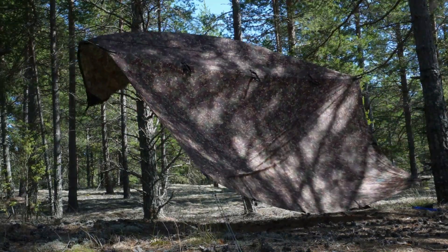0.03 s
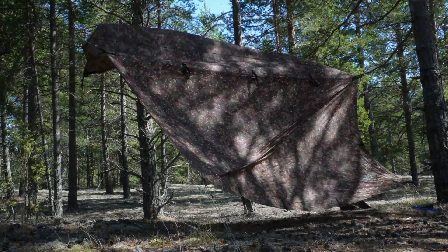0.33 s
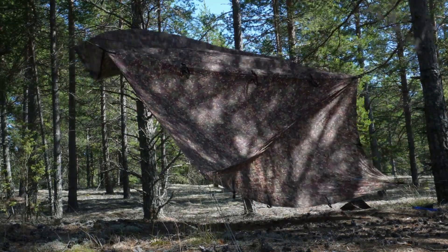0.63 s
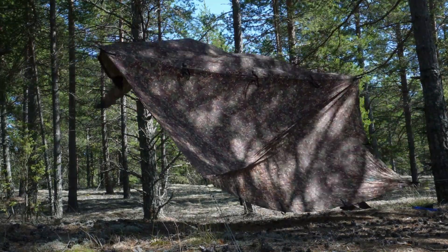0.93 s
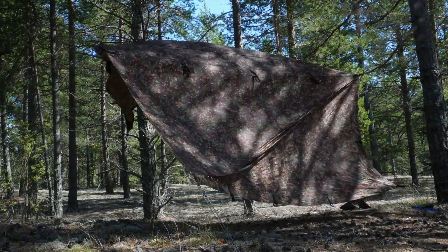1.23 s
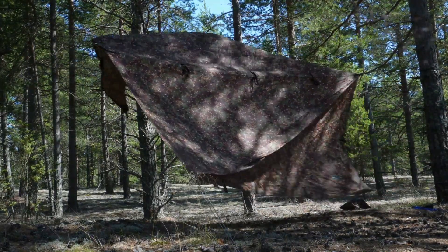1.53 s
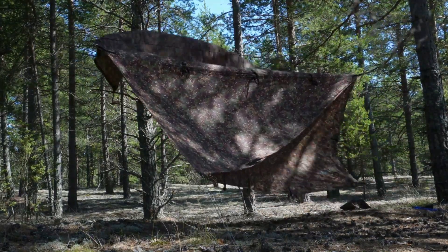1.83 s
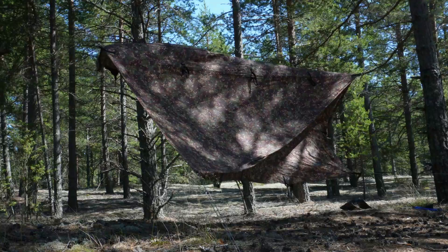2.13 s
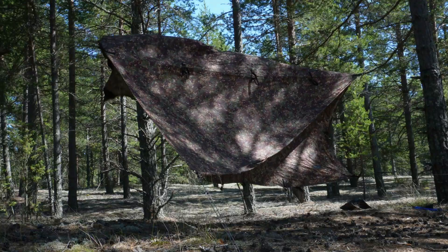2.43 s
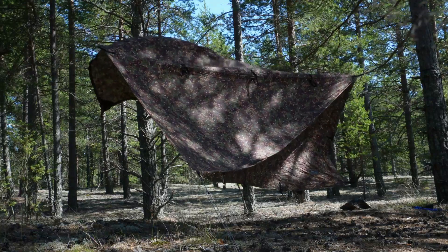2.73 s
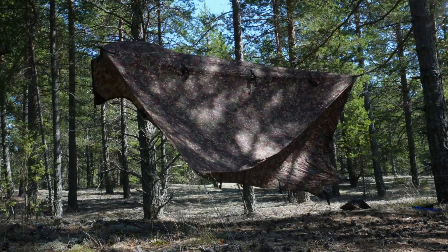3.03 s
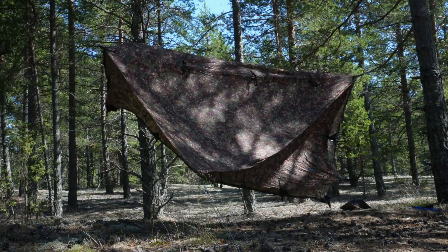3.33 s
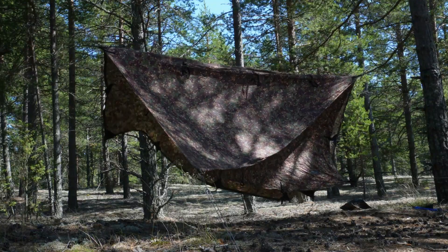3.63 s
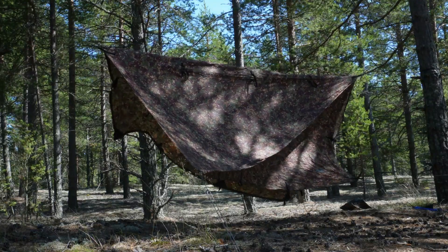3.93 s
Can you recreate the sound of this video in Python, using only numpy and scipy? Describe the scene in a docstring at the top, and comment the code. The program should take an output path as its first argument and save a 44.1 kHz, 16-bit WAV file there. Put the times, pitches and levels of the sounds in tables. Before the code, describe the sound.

A tarp rustles, snaps and flaps in gusty wind that rumbles on the microphone.

```python
"""A tarp strung between pines moves in gusty wind. From the start its cloth rustles as small creases
buckle and single folds snap, while eddies buffet the microphone and the needles hiss faintly.
At 0.67 s the sheet billows with a low whump; from then to 1.4 s slack corners flap.
The rustle sinks after 2 s and revives near 3 s, followed by a run of snaps.
At 3.8 s, cloth slides over cloth."""
import sys
import numpy as np
from scipy import signal
from scipy.fft import rfft, irfft, next_fast_len
from scipy.io import wavfile
from scipy.ndimage import uniform_filter1d, map_coordinates

SR = 44100
rng = np.random.default_rng(int(sys.argv[2]) if len(sys.argv) > 2 else 0)


def transcribe(signal):
    """Save signal, clipped to [-1, 1], as a 16-bit WAV file at the path in sys.argv[1]."""
    frames = np.atleast_2d(signal).T
    limited = np.clip(frames, -1, 1)
    pcm = np.round(limited * 32767).astype(np.int16)
    wavfile.write(sys.argv[1], SR, pcm)


N = 176400

# Spectrum of the sheet's drumming belly: f/Hz, relative level/dB
BELLY_SPECTRUM = [(40, -16), (130, -1), (230, 1.4), (330, 2.6), (430, -1), (560, -4), (750, -14.5),
                  (1300, -27.5), (4000, -44.5)]


def amp(db):
    """Amplitude ratio of a level in decibels."""
    return 10 ** (np.asarray(db) / 20)


def unit(x):
    """Normalisation to rms 1."""
    return x / np.sqrt(np.mean(x ** 2) + 1e-20)


def curve(rows):
    """Linear interpolation of (t/s, value) rows at every sample."""
    return np.interp(np.arange(N) / SR, *np.transpose(rows))


def wobble(rate_hz):
    """Smooth random modulation: a spline through Gaussian knots."""
    knots = rng.standard_normal(int(N * rate_hz / SR) + 4)
    return map_coordinates(knots, [np.arange(N) * rate_hz / SR])


def coloured(x, spectrum, tilt=0):
    """Minimum-phase filtering by (f/Hz, level/dB) rows, tilted in dB per octave."""
    m = 2 * next_fast_len(len(x) // 2 + 2048)
    f, db = np.transpose(spectrum)
    log_f = np.log(np.fft.rfftfreq(m, 1 / SR) + 1)
    gain_db = np.interp(log_f, np.log(f), db + tilt * np.log2(f / f.mean()))
    cepstrum = irfft(np.log(amp(gain_db)), m)
    cepstrum[1:m // 2] *= 2  # folding makes the filter causal
    cepstrum[m // 2 + 1:] = 0
    return irfft(rfft(x, m) * np.exp(rfft(cepstrum)), m)[:len(x)]


def noise(spectrum):
    """Spectrally shaped Gaussian noise of rms 1."""
    return unit(coloured(rng.standard_normal(N), spectrum))


def steady(x, size):
    """Division by the running rms evens the level over size samples."""
    power = uniform_filter1d(uniform_filter1d(x ** 2, size), size)
    return x / np.sqrt(np.abs(power) + 1e-12)


def add(out, start_s, sound):
    """Superposition of a sound from start_s on."""
    part = out[round(start_s * SR):][:len(sound)]
    part += sound[:len(part)]


def wind():
    """Turbulence: large eddies rumble on the microphone, small ones flutter, and pine needles hiss."""
    # Strength of large and small eddies: t/s, relative level/dB
    gusts = [(0.0, -32), (0.1, -37), (0.36, -32.5), (0.44, -30), (0.96, -33.5), (1.02, -27), (1.12, -32.5),
             (1.5, -34.5), (2.06, -30.5), (2.12, -32.5), (2.42, -32), (2.62, -27.5), (2.86, -27),
             (2.98, -28.5), (3.48, -32.5), (3.54, -36.5), (3.74, -37), (4.0, -39.5)]
    eddies = [(0.0, -38), (0.24, -33.5), (0.3, -35.5), (0.46, -40), (0.53, -28), (0.64, -49), (0.79, -33.5),
              (0.9, -47.5), (1.0, -44), (1.3, -47.5), (1.76, -39.5), (2.05, -46.5), (2.14, -39),
              (2.25, -44), (2.45, -39.5), (2.54, -33.5), (2.72, -38.5), (2.79, -35.5), (2.9, -32.5),
              (2.97, -52), (3.04, -32), (3.12, -39.5), (3.21, -35.5), (3.27, -48), (3.35, -36), (3.48, -47),
              (3.64, -41), (4.0, -43.5)]
    # Spectra of the three flow noises: f/Hz, relative level/dB
    rumble_spectrum = [(5, -20), (14, 2.5), (22, 3.5), (33, -5.5), (50, -12.5), (80, -20.5), (200, -43),
                       (800, -75)]
    flutter_spectrum = [(20, -36), (45, -0.5), (68, -0.5), (100, -6.5), (150, -12.5), (250, -27),
                        (600, -55.5), (3000, -77)]
    needle_spectrum = [(60, -4), (250, -2), (500, -8.5), (800, -11.5), (1300, -15), (2000, -16),
                       (3000, -21), (4400, -23.5), (5600, -25.5), (7000, -27), (9000, -28.5), (12000, -31),
                       (15500, -35)]
    rumble = amp(curve(gusts) + 3) * steady(noise(rumble_spectrum), size=6000)
    flutter = amp(curve(eddies) + 1.5) * steady(noise(flutter_spectrum), size=4000)
    hiss = amp(-45.5 + 0.15 * wobble(2.6)) * noise(needle_spectrum)
    return rumble + flutter + hiss


def forest_echo(x, t60_s=0.062, rise_s=0.0032):
    """Scattering from trunks and ground gives a short, exponentially decaying echo."""
    t = np.arange(SR // 2) / SR
    tail = rng.standard_normal(len(t)) * amp(-60 * t / t60_s) * (1 - np.exp(-t / rise_s))
    return signal.fftconvolve(x, tail / np.linalg.norm(tail))[:N]


def slide(peak_s=3.827, rise_s=0.15, fall_s=0.14):
    """Sliding friction of cloth on cloth makes a hiss that swells and fades."""
    # Friction spectrum: f/Hz, relative level/dB
    friction_spectrum = [(1500, -9), (4200, -12), (5700, 6), (6800, 2), (8500, 6), (11000, 0), (15500, -8)]
    t = np.arange(N) / SR - peak_s
    swell = np.exp(-(t / np.where(t < 0, rise_s, fall_s)) ** 2)
    return amp(-52.5) * swell * noise(friction_spectrum)


def billow(peak_s=0.672, width_s=0.075):
    """The pressure of a gust fills the whole sheet, which radiates a low, ruffling whump."""
    t = np.arange(N) / SR - peak_s
    return amp(-31.5) * np.exp(-(t / width_s) ** 2) * steady(noise(BELLY_SPECTRUM), size=1000)


def flaps(decay_cycles=0.95):
    """Damped oscillation: a slack corner pulls taut with a dull knock and a puff of air."""
    # Flapping corners: t/s, relative level/dB, f/Hz
    corners = [(.661, -22.5, 330), (0.67, -22.5, 267), (.836, -24, 647), (0.989, -23.5, 370),
               (1.430, -24.5, 640)]
    out, t = np.zeros(N), np.arange(SR // 10) / SR
    for start_s, db, hz in corners:
        age = hz * t / decay_cycles
        envelope = np.sqrt(2 * age) * np.exp(0.5 - age)
        band = signal.butter(1, [hz / 2, hz * 2], "band", fs=SR, output="sos")
        puff = amp(-15) * unit(signal.sosfilt(band, rng.standard_normal(len(t))))
        add(out, start_s, amp(db + 2) * envelope * (np.sin(2 * np.pi * hz * t) + puff))
    return out


def snaps(crumple_stretch=2.1):
    """Snap-through buckling: a fold starts to give, pops with a crack and crumples on."""
    # Snapping folds: t/s, relative level/dB, tilt/(dB per octave), decay time/s
    folds = [(0.085, -20, -11, 0.0014), (0.115, -25, -4, 0.0018), (.119, -32, 6, 0.0023),
             (0.137, -19, -9.5, 0.0026), (.161, -19.5, -1, 0.0012), (.294, -20.5, -5, 0.0028),
             (0.528, -27, 2, .002), (.629, -18, -11, 0.0024), (0.6635, -36, 29, 0.0017),
             (.700, -27, 9, 0.00083), (.724, -19.5, 1, 0.0025), (.797, -24, 1.5, 0.0009),
             (0.812, -24, 5, .001), (.899, -32.5, 4.5, 0.003), (.967, -31.5, 4, .002),
             (.985, -28, -4, 0.0025), (.990, -20, -4.5, 0.0018), (.999, -33, -1, .002),
             (1.148, -25, -11, 0.00072), (1.1736, -15, 2.5, 0.0006), (1.1855, -23, 1, .001),
             (1.275, -35, 8, 0.0011), (1.442, -22.5, -3, 0.0015), (1.677, -29, 0, .0015),
             (1.72, -25, -5.5, 0.0026), (1.911, -27, -4, 0.0045), (2.092, -30, 3.5, 0.0011),
             (2.294, -36, 1, 0.0032), (2.348, -36, -3, 0.0017), (2.63, -29, -8, 0.0033),
             (2.776, -27, -3, .003), (3.003, -32, 6, .001), (3.179, -22, -1.5, 0.0048),
             (3.197, -26, 2, .003), (3.294, -24, 2.5, 0.0047), (3.325, -23, -2, .002),
             (3.377, -18, -5.5, 0.0015), (3.387, -26, -2.5, 0.0036), (3.434, -22.5, 1.5, 0.0014),
             (3.449, -21, -1, 0.0037), (3.480, -23, -1, 0.0014), (3.552, -29, -5, 0.0014),
             (3.654, -23.5, -15, 0.0021), (3.924, -25.5, -4, 0.0033), (3.966, -25, -1, 0.0067)]
    # Crack spectrum before tilting: f/Hz, relative level/dB
    crack_spectrum = [(150, -45), (700, -8.5), (1400, 4.5), (2400, 1), (3400, -2), (4400, -11),
                      (5600, -11.5), (7000, -21.5), (8800, -18), (11500, -32), (15500, -44)]
    out, lead = np.zeros(N), SR // 50
    t = np.arange(-lead, SR // 10) / SR
    for crack_s, db, tilt, decay_s in folds:
        crack, crumple = rng.standard_normal((2, len(t)))
        crack *= (t >= 0) * np.exp(-np.abs(t) / decay_s)
        crumple *= np.exp(-np.abs(t) / (decay_s * np.where(t < 0, 1, crumple_stretch)))
        pop = coloured(crack + amp(-15) * crumple, crack_spectrum, tilt)
        pop *= np.sqrt(decay_s * SR) / np.linalg.norm(pop)  # energy grows with decay time
        add(out, crack_s - lead / SR, amp(db - 6) * pop)
    return out


def creases(spectrum, per_s, spread_db, patches=16):
    """Shot noise: patches of cloth click at random, each with its own colour and swell."""
    out = np.zeros(N)
    for _ in range(patches):
        clicks = (rng.random(N) < per_s / patches / SR) * rng.choice([-1, 1], N)
        sizes = amp(spread_db * np.minimum(rng.standard_normal(N), 2))
        colour = [(hz, db + 3.5 * rng.standard_normal()) for hz, db in spectrum]
        out += unit(coloured(clicks * sizes, colour)) * amp(5 * wobble(rate_hz=11))
    return steady(out, size=1800)


def rustle(brightening=0.2, belly_coupling=0.78):
    """Buckling and friction of creases, brighter in hard motion; the weave ticks and the belly drums."""
    # Strength of the cloth's motion and of the stiff weave's crackle: t/s, relative level/dB
    motion = [(0.0, -38), (0.13, -36), (0.18, -38), (0.26, -39.5), (0.39, -31.5), (0.44, -34), (0.5, -32),
              (0.56, -33.3), (0.63, -30.3), (0.71, -29.5), (0.76, -32.5), (0.84, -41), (0.95, -40),
              (0.99, -36.5), (1.04, -37.5), (1.13, -37.5), (1.2, -36), (1.35, -44.5), (1.64, -35),
              (1.8, -41.5), (1.93, -36), (1.96, -38), (2.0, -34), (2.04, -43), (2.15, -40), (2.18, -50),
              (2.42, -49.5), (2.68, -43.5), (2.89, -37.5), (3.05, -35), (3.16, -38.5), (3.18, -37.5),
              (3.22, -39.5), (3.31, -35), (3.36, -43.5), (3.45, -39.5), (3.5, -44.5), (3.72, -47),
              (3.8, -41), (3.86, -42), (3.96, -37), (4.0, -42.5)]
    crackle = [(0.0, -46), (0.14, -63), (0.24, -54), (0.37, -53), (0.46, -59), (0.62, -47), (0.73, -54),
               (0.83, -71), (1.0, -63), (1.33, -58.5), (1.55, -54), (1.68, -46.5), (1.7, -63), (1.79, -57),
               (2.0, -49.5), (2.06, -54.5), (2.14, -50.5), (2.18, -64), (2.34, -55.5), (2.42, -61),
               (2.8, -59), (3.04, -66), (3.33, -50), (3.58, -57.5), (3.96, -50)]
    # Spectra of creases and of sharp ticks: f/Hz, relative level/dB
    cloth_spectrum = [(100, -28.5), (450, -6.5), (740, -7.5), (960, -0.54), (1330, 1.6), (1700, -2.5),
                      (2050, -8.5), (2600, -7), (3500, -14.5), (4400, -24), (5500, -22.5), (6800, -32.5),
                      (8200, -29), (11000, -38), (15500, -42)]
    tick_spectrum = [(400, -46), (1500, 6), (2600, 1.5), (3600, 8), (4400, -4.5), (5600, 2.5), (6900, -7.5),
                     (8600, -8), (11500, -11.5), (15500, -15)]
    motion_db = curve(motion)
    effort_db = motion_db - motion_db.mean()
    buckling = amp(-2) * creases(cloth_spectrum, per_s=2200, spread_db=5)
    rubbing = amp(-3.5) * noise(cloth_spectrum)
    crinkle = buckling + rubbing
    treble = signal.sosfiltfilt(signal.butter(2, 2000, "high", fs=SR, output="sos"), crinkle)
    crinkle += (amp(brightening * effort_db) - 1) * treble
    belly = amp(-41.5 + belly_coupling * effort_db) * creases(BELLY_SPECTRUM, per_s=1200, spread_db=4)
    ticks = amp(curve(crackle) - 0.5) * creases(tick_spectrum, per_s=300, spread_db=6)
    flicker = amp(1.27 * wobble(rate_hz=85))
    return flicker * (amp(motion_db) * crinkle + ticks + belly)


def scene():
    """Superposition of the tarp's direct sound, its faint echo and the wind."""
    tarp = rustle() + billow() + snaps() + flaps() + slide()
    return (tarp + amp(-19.5) * forest_echo(tarp) + wind())[None]


def record(dry, cutoff_hz=15600):
    """Band limiting: an ideal low-pass filter removes the highest treble."""
    m = next_fast_len(N + SR // 2)
    passband = np.fft.rfftfreq(m, 1 / SR) < cutoff_hz
    return irfft(rfft(dry, m) * passband, m)[..., :N]


dry = scene()
out = record(dry)
transcribe(out)
```